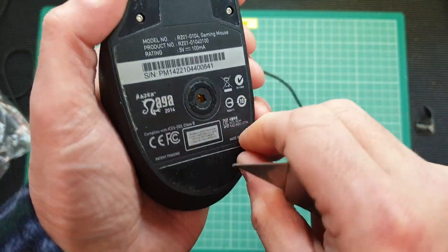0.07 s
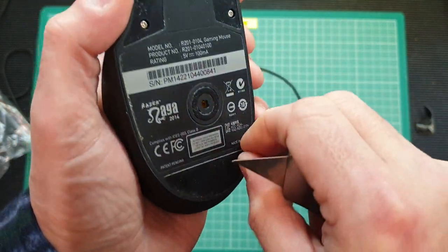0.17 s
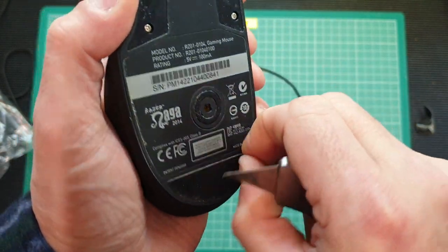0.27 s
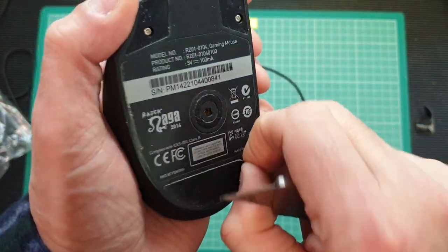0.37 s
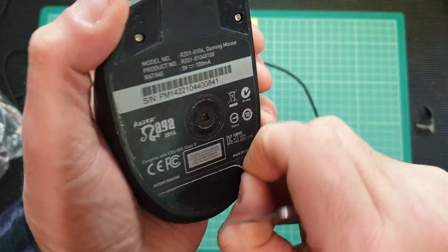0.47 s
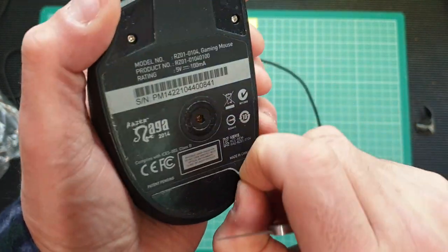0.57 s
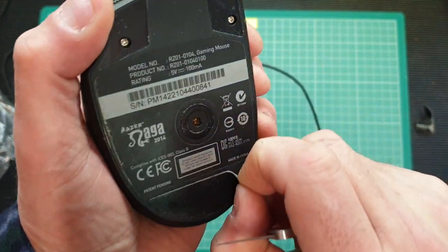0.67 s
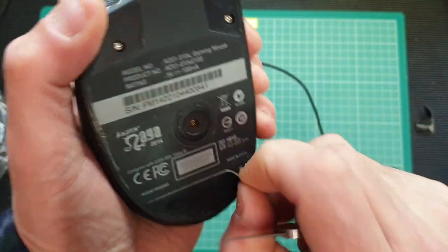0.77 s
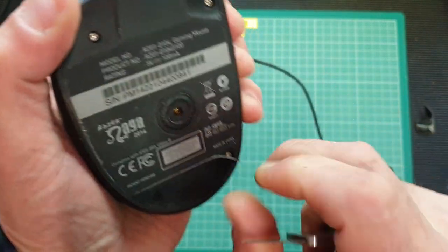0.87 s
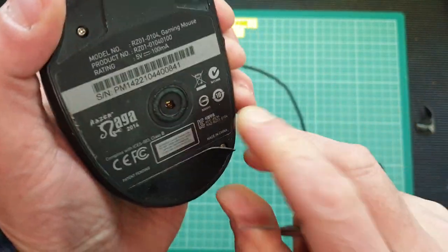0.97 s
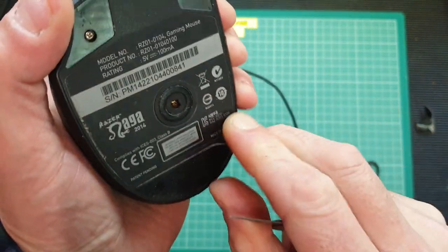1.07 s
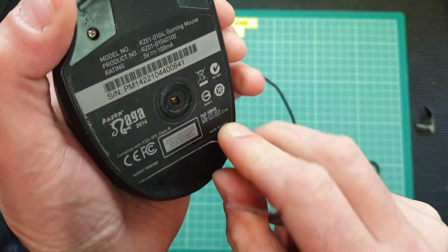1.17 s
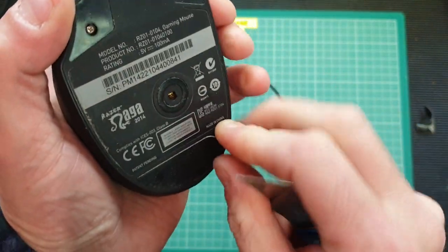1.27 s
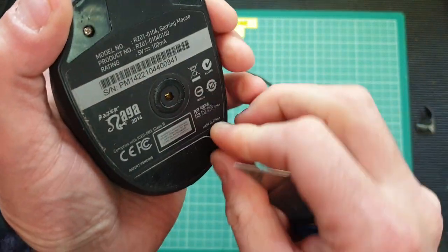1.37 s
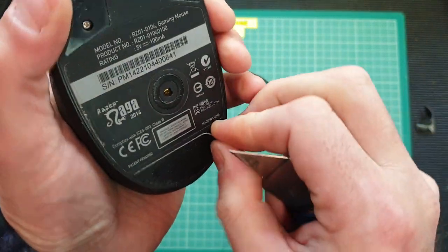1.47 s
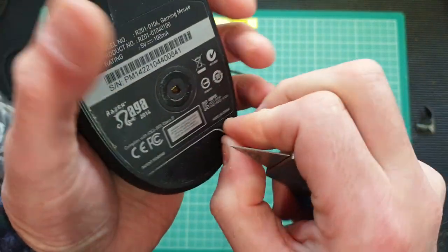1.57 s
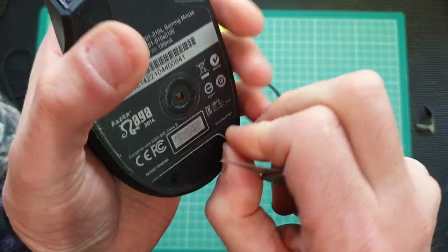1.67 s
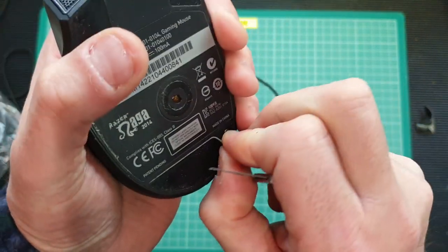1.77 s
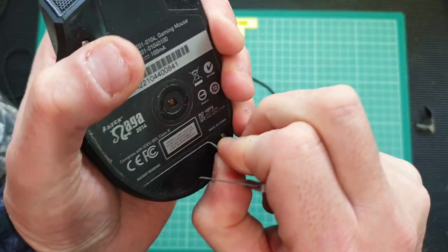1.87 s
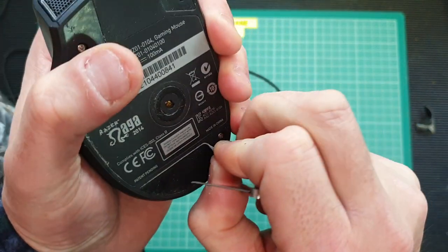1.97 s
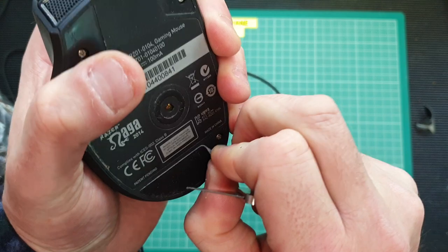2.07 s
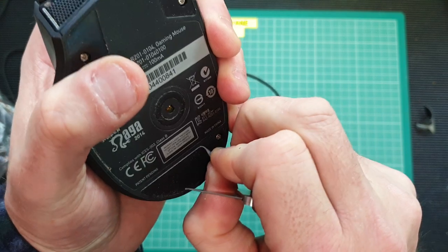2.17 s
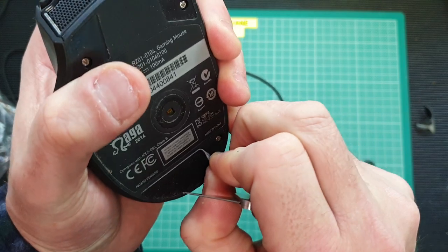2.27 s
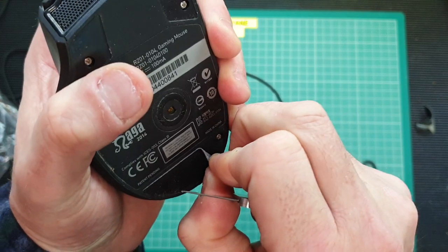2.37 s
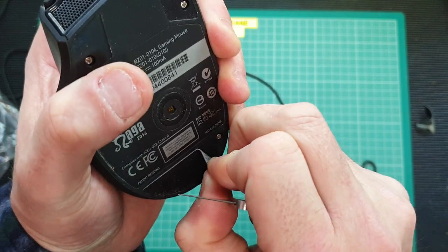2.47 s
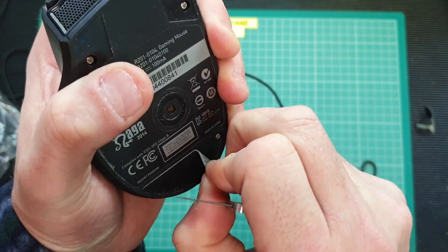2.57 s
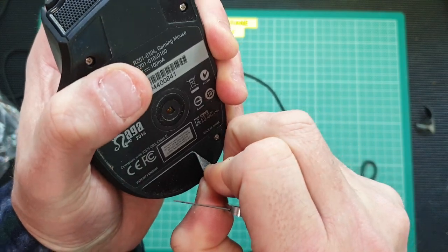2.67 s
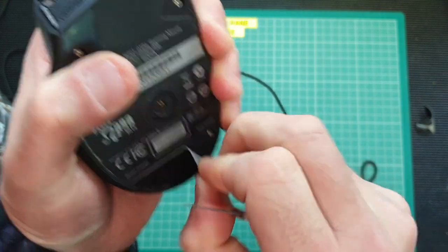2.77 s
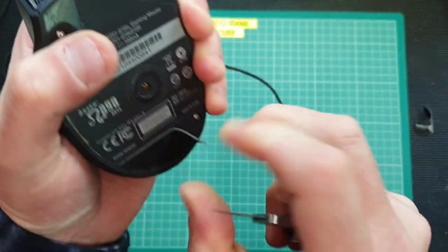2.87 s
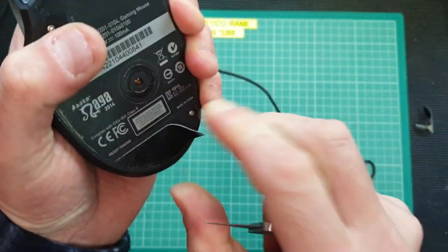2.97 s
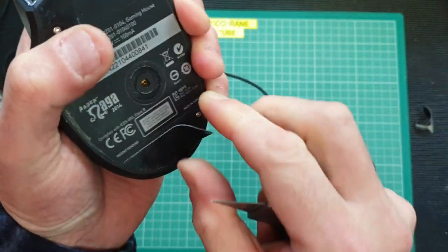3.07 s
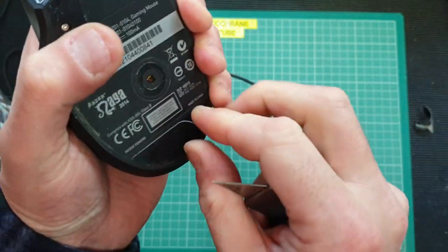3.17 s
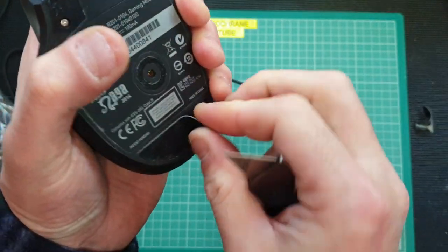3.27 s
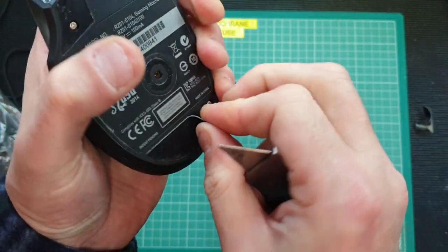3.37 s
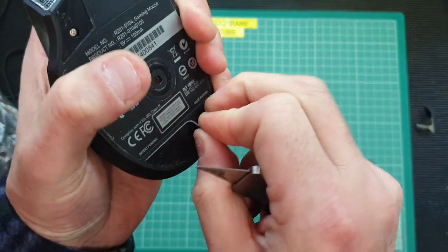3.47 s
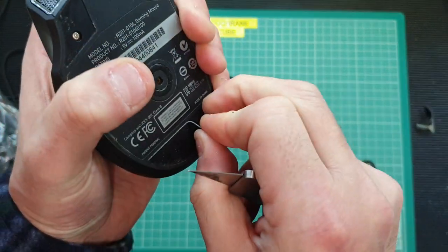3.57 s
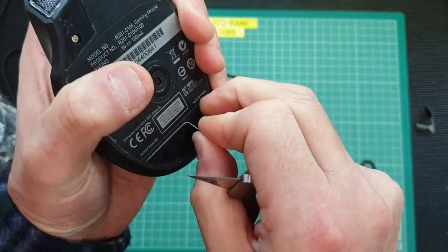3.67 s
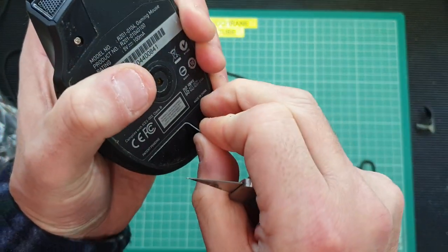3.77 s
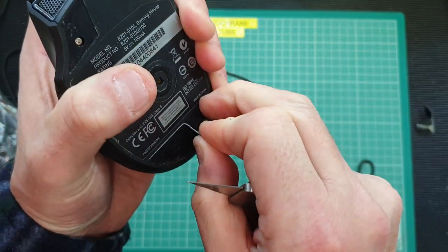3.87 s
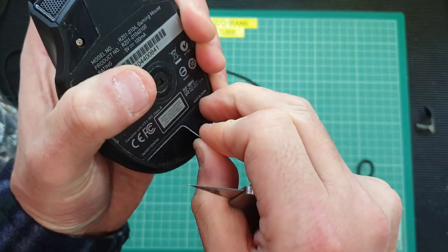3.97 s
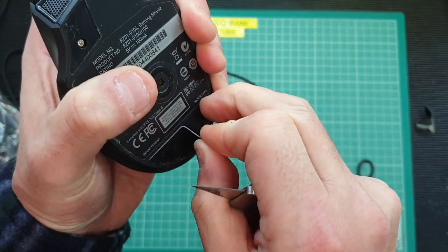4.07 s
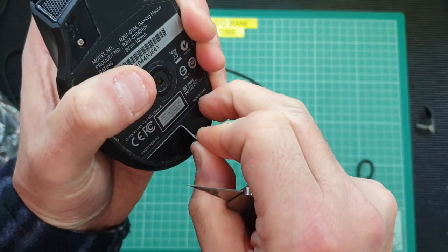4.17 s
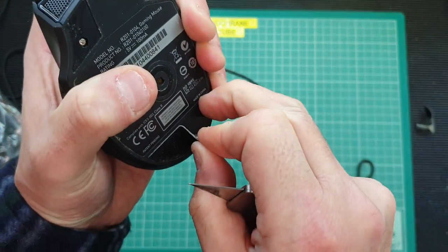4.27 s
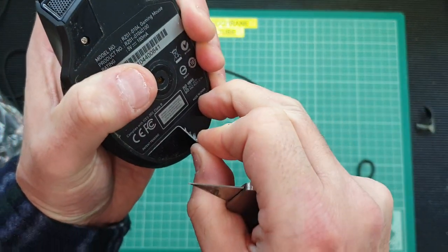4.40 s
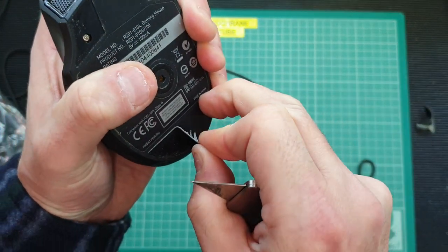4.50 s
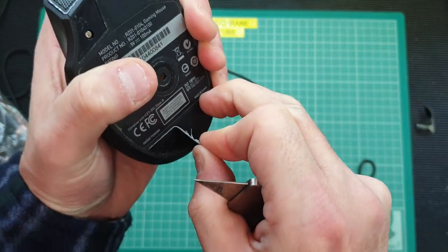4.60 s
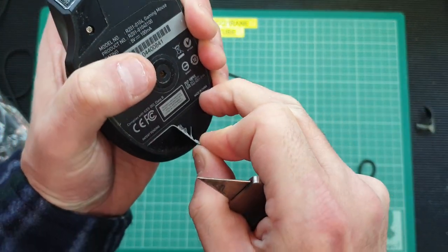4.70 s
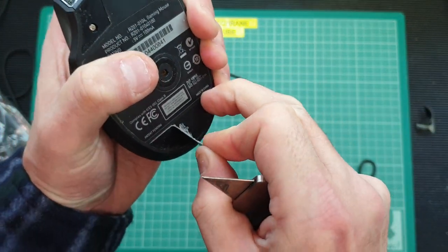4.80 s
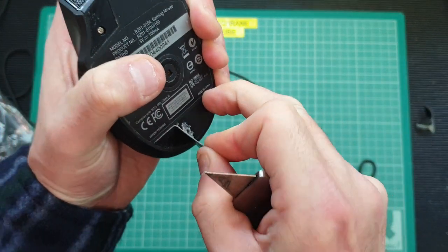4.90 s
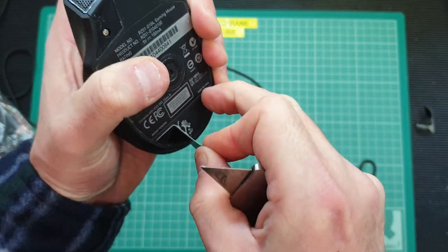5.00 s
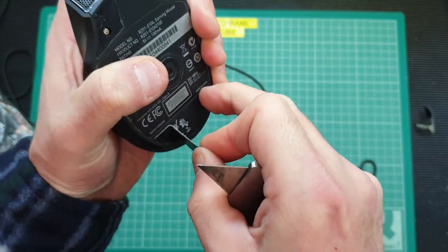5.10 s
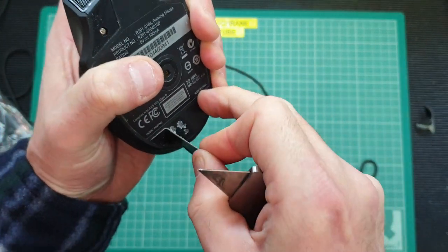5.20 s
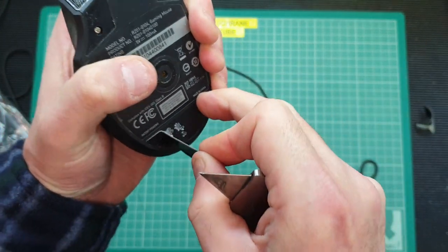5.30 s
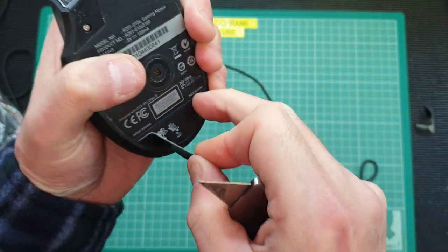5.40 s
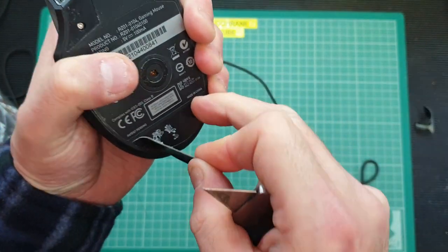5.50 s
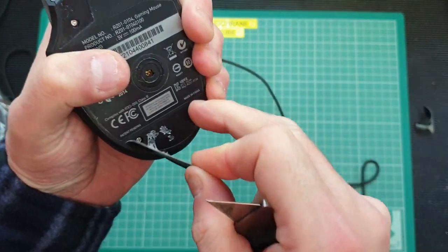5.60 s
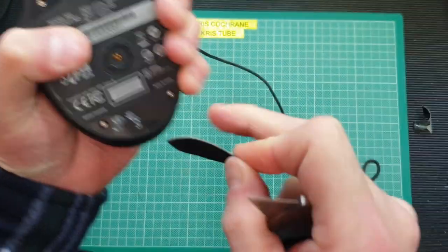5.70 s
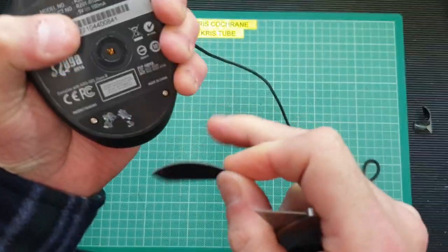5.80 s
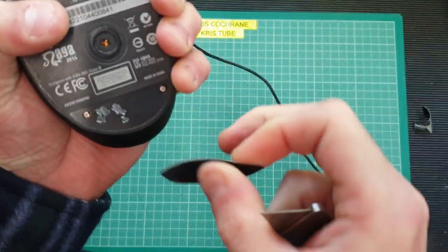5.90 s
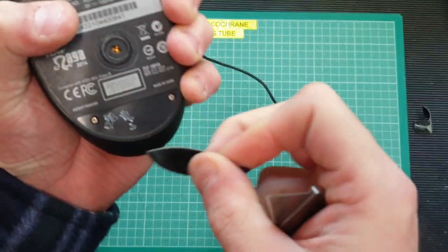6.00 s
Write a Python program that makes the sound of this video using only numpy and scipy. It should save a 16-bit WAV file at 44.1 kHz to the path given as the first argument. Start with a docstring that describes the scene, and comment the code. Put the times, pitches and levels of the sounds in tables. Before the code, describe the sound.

Close stereo microphones pick up small handwork on light plastic: a faint skin squeak, crisp nail and blade taps, sparse sticky snaps. Peeling follows in two bursts, the first thin and scratchy, the second denser and buzzier, with a hard crack as the pad comes free. Short, tight reflections, quiet room air and a slowly rising low hum lie behind it.

```python
"""Dense crackle, ticks and one sharp snap, close by: a glued plastic pad is picked loose with a blade and
peeled off the base of a hand-held computer mouse. Random thread breaks click and ring base, pad and hollow shell;
blade and nails tick as short noise bursts and damped modes; skin rubs and once squeaks in tiny slips.
The small dry room is short noise tails. Filtered noise makes its air, and sines with rumble make the low drone
of a motor that slowly gains speed, easing slightly near the end."""
import sys
import numpy as np
from scipy import signal
from scipy.fft import rfft, irfft
from scipy.io import wavfile
from scipy.ndimage import uniform_filter1d

SR = 44100
rng = np.random.default_rng(int(sys.argv[2]) if len(sys.argv) > 2 else 0)


def to_wav(s):
    """Save 16-bit WAV."""
    ch = np.atleast_2d(s).T  # columns
    pcm = np.round(np.clip(ch, -1, 1) * 32767)  # PCM
    wavfile.write(sys.argv[1], SR, pcm.astype(np.int16))


N = 266672

# air and walls of the hollow shell: [f/Hz, width/Hz, relative level/dB]
SHELL_MODES = [(629, 80, -6), (780, 120, 4), (850, 100, 2.5), (1250, 450, -13)]
# half of any left-right contrast goes to each microphone, left first
LEFT_RIGHT = np.array([[1], [-1]]) / 2


def amp(db):
    """Decibels to gain."""
    return 10 ** (np.asarray(db) / 20)


def unit(x):
    """Scale to rms 1."""
    return x / np.sqrt(np.mean(x ** 2))


def unit_energy(y):
    """Scale a response to energy 1."""
    return y / np.linalg.norm(y)


def curves(table):
    """Columns of a table, joined by straight lines in time."""
    times, *columns = np.transpose(table)
    return [np.interp(np.arange(N) / SR, times, column) for column in columns]


def walk(rate):
    """Smooth random drift with rms 1, from random steps at the given rate per second."""
    step = max(int(SR / rate), 1)
    stairs = np.repeat(rng.standard_normal(N // step + 1), step)
    return unit(uniform_filter1d(stairs, step)[:N])


def add(track, time_s, sound):
    """Mix a sound into a track at a time."""
    start = int(time_s * SR)
    track[start:start + len(sound)] += sound[:N - start]


def through(x, response):
    """Pass a sound through a response."""
    return signal.fftconvolve(x, response)[:N]


def impulse(points, peak_hz=1000, peak_db=0, size=4096):
    """Minimum-phase click of energy 1 with a drawn spectrum and one optional resonance."""
    hz, db = np.transpose(points)
    log_hz = np.log(np.fft.rfftfreq(size, 1 / SR) + 1)
    resonance = peak_db / (1 + ((log_hz - np.log(peak_hz)) / 0.28) ** 2)
    spectrum_db = np.interp(log_hz, np.log(hz), db) + resonance
    # folding the cepstrum forward puts the energy as early as it can be
    cepstrum = irfft(np.log(amp(spectrum_db)))
    cepstrum[1:size // 2] *= 2
    cepstrum[size // 2 + 1:] = 0
    return unit_energy(irfft(np.exp(rfft(cepstrum))))


def ring(modes, size=4096):
    """Coupled damped modes that swell quickly and die away; energy 1."""
    t = np.arange(size) / SR
    y = np.zeros(size)
    for hz, width, db in modes:
        envelope = width ** 2 * t * np.exp(-np.pi * width * t)
        y += amp(db) * envelope * np.sin(2 * np.pi * hz * t)
    return unit_energy(y)


def tail(start_s, t60, size=16384):
    """Dense reflections that begin after start_s and fall 60 dB in t60 seconds; energy 1."""
    t = np.arange(size) / SR - start_s
    decay = np.exp(-np.log(1000) * np.abs(t) / t60)
    return unit_energy(rng.standard_normal(size) * (t > 0) * decay)


def even(y):
    """Keep the timing of a response but level its broad colour; energy 1."""
    spectrum = rfft(y, 2 * len(y))
    power = uniform_filter1d(np.abs(spectrum) ** 2, size=len(y) // 64)
    return unit_energy(irfft(spectrum / np.sqrt(power))[:len(y)])


def space(x, pan_db, hands_db, room_db):
    """Direct sound, left first; scatter from the hands, then desk and walls."""
    right_lag_s = .00016
    out = []
    # the right microphone takes up only a little of the pan
    for side, lag_s in ((1, 0), (0.16, right_lag_s)):
        side_db = side * pan_db / 2
        near = amp(hands_db) * tail(.0002, .008)
        near[int(lag_s * SR)] += 1
        # the pan is taken back out of the room, so a nearer side sounds drier
        far = amp(room_db - side_db) * (tail(.002, 0.092) + amp(-13) * tail(0.011, 0.21))
        out.append(amp(side_db) * through(x, even(near + far)))
    return np.array(out)


def moving(x, pan_db, hands_db, room_db):
    """The hands shift, so the sound passes between two patterns of reflections."""
    angle = 1.644 * walk(3)
    first = space(x * np.cos(angle), pan_db, hands_db, room_db)
    second = space(x * np.sin(angle), pan_db, hands_db, room_db)
    return first + second


def gate_db(start, end):
    """Attack, hold and release of a stroke, in dB below its full level."""
    attack_db_per_s, release_db_per_s = 350, 300
    t = np.arange(N) / SR
    attack = attack_db_per_s * np.maximum(start - t, 0)
    release = release_db_per_s * np.maximum(t - end, 0)
    return np.maximum(-attack - release, -100)


def strokes(rows):
    """Level in dB over time of strokes given as (start, length, dB)."""
    return np.max([db + gate_db(s, s + length) for s, length, db in rows], axis=0)


def threads(rate, spread_db, bunch_db):
    """Stick-slip breaks at random, smallest sizes most common, bunched in level; rms 1."""
    breaks = rng.random(N) < rate / SR
    size_db = spread_db * np.minimum(rng.exponential(size=N), 4)
    size = amp(size_db) * rng.choice([-1, 1], N)
    return unit(breaks * size * amp(bunch_db * walk(110)))


def air(level_db):
    """Room rumble, alike at both microphones, under a thin unrelated hiss."""
    # spectrum of the room air: [f/Hz, relative level/dB]
    air_spectrum = [(20, -16.5), (40, -0.5), (75, -3), (130, -9.5), (200, -24.5), (310, -18), (420, -27.5),
                    (650, -33.5), (800, -24.5), (1050, -33), (6700, -38.5), (8400, -45), (11600, -33),
                    (16000, -30.5)]
    low_pass = signal.butter(1, 700, fs=SR, output="sos")
    high_pass = signal.butter(1, 500, "high", fs=SR, output="sos")
    shared = signal.sosfilt(low_pass, rng.standard_normal(N))
    own = signal.sosfilt(high_pass, rng.standard_normal((2, N)))
    drift = amp(level_db + 1.0 * walk(2.45))
    return drift * np.array([through(shared + hiss, impulse(air_spectrum)) for hiss in own])


def drone():
    """A motor drones and rumbles through the building, beside a hum near twice its turning rate."""
    # overtones of the motor: [multiple of turning rate, relative level/dB, share of swell followed/0-1]
    motor_orders = [(1, -42, 1), (2, -62.5, .8), (3, -78, 0.07)]
    # swell of the motor, taken against its usual level: [t/s, level/dB]
    motor_swell = [(0.0, -77), (0.3, -55), (0.6, -58), (1.03, -52), (1.09, -68), (1.33, -53), (1.63, -60),
                   (1.7, -72), (2.1, -56), (2.14, -63), (2.47, -49), (3.2, -47), (3.65, -39), (4.13, -45),
                   (4.28, -40), (5.44, -39), (5.49, -42), (6.05, -44)]
    # spectrum of the rumble: [f/Hz, relative level/dB]
    rumble_spectrum = [(20, -24), (55, -3.5), (80, 5), (125, -3.5), (180, -10), (250, -14), (320, -13),
                       (420, -24), (1000, -41), (4000, -61)]
    # the turning rate climbs along an arch
    top_hz, top_s, bend_hz_per_s2 = 51.3, 4.6, 0.41
    lead = 0.61 * LEFT_RIGHT  # radians by which the left leads
    hz = top_hz - bend_hz_per_s2 * (np.arange(N) / SR - top_s) ** 2
    phase = 2 * np.pi * np.cumsum(hz) / SR
    swell_db = curves(motor_swell)[0] + 42.7

    motor = np.zeros((2, N))
    for multiple, order_db, share in motor_orders:
        level = amp(order_db + share * swell_db + 0.78 * walk(10))
        motor += level * np.sin(multiple * phase + lead)

    hum_hz = 96.5 * (1 + 0.0063 * walk(6.95))
    hum_phase = 2 * np.pi * np.cumsum(hum_hz) / SR
    hum = amp(-57.5 + 0.78 * walk(4) + 0.3 * swell_db) * np.sin(hum_phase + lead)

    noise = through(rng.standard_normal(N), impulse(rumble_spectrum))
    rumble = amp(-67 + 0.84 * swell_db) * noise
    return (np.sqrt(2) * (motor + hum) + rumble) * amp(-1.9 * LEFT_RIGHT)


def fingertip():
    """A fingertip slides over the plastic near the end, in tiny slips with a soft hiss."""
    # level of the slide: [t/s, level/dB]
    slide_levels = [(5.9, -88), (5.97, -81), (5.985, -57), (6.02, -63), (6.05, -77)]
    skin_modes = [(5200, 800, -4), (6120, 900, -6), (6900, 400, -12)]  # f/Hz, width/Hz, level/dB
    rub = threads(rate=3900, spread_db=0, bunch_db=0.5) * amp(curves(slide_levels)[0])
    return space(through(rub, ring(skin_modes)), pan_db=6.0, hands_db=-3.5, room_db=-6.5)


def grip():
    """Fingers shift on the shell: skin drags in small slips, and once squeaks softly."""
    # drags of the skin: [start t/s, length/s, level/dB]
    grip_shifts = [(0.74, 0.04, -78), (1.1, 0.08, -79), (1.53, 0.02, -70), (1.8, 0.14, -73),
                   (3.19, 0.07, -73), (3.33, 0.08, -69), (3.46, 0.16, -73)]
    # what the grip rings with: [f/Hz, width/Hz, relative level/dB]
    grip_modes = [(335, 90, 1), (815, 130, -2), (2000, 600, -7)]
    squeak_stroke = (0.0, 0.08, -71)  # start/s, length/s, level/dB
    squeak_mode = (1820, 200, 0)  # f/Hz, width/Hz, level/dB
    slips = threads(rate=900, spread_db=2.0, bunch_db=2.5)
    drag = through(slips * amp(strokes(grip_shifts)), ring(grip_modes))
    squeak = through(slips * amp(strokes([squeak_stroke])), ring([squeak_mode]))
    return space(drag + squeak, pan_db=3.0, hands_db=-3.0, room_db=-3.0)


def fracture(level_db):
    """A catch crumbles in a short flurry of slips; the harder the break, the shorter it is."""
    t60 = 0.0097 * amp(-.2 * (level_db + 53))
    return even(tail(0, t60, size=1024))


def ticks(rows, echo_db=0):
    """A catch lets go: the edge cracks, the plastic flexes at its own pitch, the shell knocks."""
    # spectrum of the cracking edge: [f/Hz, relative level/dB]
    edge_spectrum = [(200, -23.5), (1000, -41.5), (3500, -19), (5500, -9.5), (7000, -9), (9000, -10.5),
                     (11000, -4), (12300, -2), (14000, -2), (16500, -5)]
    # spectrum of the flexing plastic: [f/Hz, relative level/dB]
    flex_spectrum = [(150, -9), (310, -8), (450, -17), (1050, -14), (1500, -6.5), (2100, -2), (2900, -2.5),
                     (3600, -8), (4300, -8), (7000, -11), (12000, -19)]
    edge, flex, knock = np.zeros((3, N))
    crack = impulse(edge_spectrum)
    for s, edge_db, flex_db, knock_db, hz in rows:
        add(edge, s, amp(edge_db + 27.5) * signal.fftconvolve(fracture(edge_db), crack))
        add(flex, s, amp(flex_db + 26.5) * impulse(flex_spectrum, peak_hz=hz, peak_db=8))
        # each place of contact and each grip favours other modes of the shell
        shell = [(f * (1 + 0.024 * rng.normal()), width, db + 2 * rng.normal())
                 for f, width, db in SHELL_MODES]
        add(knock, s, amp(knock_db + 25.5) * ring(shell))
    return (space(edge, pan_db=4.5, hands_db=-4, room_db=echo_db - 4)
            + space(flex, pan_db=0.5, hands_db=3, room_db=echo_db + 2.5)
            + space(knock, pan_db=6.0, hands_db=-4.5, room_db=echo_db - 1.5))


def taps():
    """Blade and nail tap the plastic, each with its own mix of edge, flex and knock."""
    # levels ahead of each layer's make-up gain:
    # [t/s, crisp edge level/dB, flexing plastic level/dB, hollow knock level/dB, flexing spot f/Hz]
    tap_rows = [(0.0988, -87, -61, -57.5, 1200), (0.121, -54, -55, -61, 1700),
                (0.5798, -48, -61, -61.5, 1400), (0.8968, -63, -56.5, -65, 2100),
                (0.9933, -46.5, -54, -60.5, 4040), (1.6041, -54.5, -57, -53.5, 1300),
                (1.678, -47.5, -61, -57, 2680), (1.7685, -46, -60, -80, 1780),
                (1.8008, -63, -56, -61, 1900), (2.1518, -43, -52, -73, 1500),
                (2.904, -47.5, -37, -51, 2450), (2.9147, -46, -55, -61, 2534),
                (3.5946, -40, -49.5, -49.5, 1990), (5.2514, -56.5, -53, -67.5, 2240)]
    return ticks(tap_rows)


def strands():
    """Thick strands snap singly: thin ticks at first, fuller as the pad comes free to flex."""
    # snaps, ahead of the make-up gain: [t/s, level/dB]
    snap_rows = [(0.387, -50), (0.4308, -54), (0.456, -53), (0.516, -54.5), (0.6038, -54.5), (0.6438, -57),
                 (1.8971, -52), (2.088, -53.5), (2.3917, -50.5), (2.4306, -53.5), (2.4791, -50),
                 (3.7633, -49), (4.2349, -51.5), (4.5729, -54), (4.7701, -49.5), (4.938, -49),
                 (4.9814, -52), (5.2829, -55), (5.5801, -53), (5.6057, -50), (5.685, -51), (5.815, -60)]
    # flex and shell knock against the snap; the flex grows with time
    flex_db, flex_db_per_s, knock_db, flex_hz = -23, 3.0, -27, 4400
    return ticks([(s, db, db + flex_db + flex_db_per_s * s, db + knock_db, flex_hz)
                  for s, db in snap_rows])


def let_go():
    """The pad lets go in one loud, sharp snap; a little light snapping from other layers follows."""
    # t/s, then edge, flex and knock level/dB ahead of make-up gain, flexing spot f/Hz
    snap = (5.7111, -20.5, -31.5, -38.5, 3000)
    pan_db = 1.5
    return ticks([snap], echo_db=-1) * amp(pan_db * LEFT_RIGHT)


def effort():
    """Levels of glue, base and pad in dB, set by the loudest pick or pull at each moment."""
    # levels in these tables stand ahead of each layer's trim
    # short picks at the edge of the pad: [start t/s, length/s, snapping glue level/dB, base rasp level/dB]
    pick_rows = [(0.36, 0.29, -63.5, -76), (0.895, 0.055, -67, -66), (1.14, 0.08, -75, -79),
                 (1.33, 0.06, -73, -80), (5.93, 0.12, -63, -73)]
    # the first pull lifts a corner: [t/s, snapping glue level/dB, base rasp level/dB, pad buzz level/dB]
    first_pull = [(1.48, -79, -78, -89), (1.64, -58, -67, -73), (1.74, -58, -72, -77), (1.8, -57, -65, -69),
                  (2.0, -69, -73, -86), (2.11, -60, -64, -76), (2.22, -65, -67, -76), (2.39, -58, -63, -72),
                  (2.56, -63, -67, -67), (2.76, -64, -71, -76)]
    # the second strips the pad: [t/s, snapping glue level/dB, base rasp level/dB, pad buzz level/dB]
    second_pull = [(3.52, -74, -79, -80), (3.58, -56, -59, -65), (3.82, -59, -61, -66),
                   (3.89, -54, -56, -60), (3.97, -66, -68, -72), (4.19, -64, -68, -72),
                   (4.42, -58, -62, -67), (4.6, -57, -60, -62), (4.7, -58, -62, -66), (5.0, -52, -60, -62),
                   (5.17, -57, -61, -61), (5.24, -64, -69, -70), (5.38, -57, -66, -66),
                   (5.45, -61, -73, -73), (5.51, -48, -62, -63), (5.67, -52, -64, -67),
                   (5.705, -38, -52, -58)]
    pick_pad_db = -10  # a pick hardly moves the pad: its buzz against the rasp
    levels = []
    for s, length, glue, base in pick_rows:
        full = np.array([[glue], [base], [base + pick_pad_db]])
        levels.append(full + gate_db(s, s + length))
    for pull in (first_pull, second_pull):
        # a pull swells and fades twice as fast in dB as a pick
        levels.append(np.array(curves(pull)) + 2 * gate_db(pull[0][0], pull[-1][0]))
    return np.max(levels, axis=0)


def peeling():
    """Each breaking thread clicks, rasps the base and plucks the pad, which passes a little to the shell."""
    # spectrum of snapping glue: [f/Hz, relative level/dB]
    glue_spectrum = [(300, -38), (1200, -30), (2400, -17.5), (3600, -18), (5600, -14), (8300, -12.5),
                     (10500, -5.5), (12500, -2), (15000, 0), (16500, -7)]
    # bending of the stiff base: [f/Hz, width/Hz, relative level/dB]
    base_modes = [(4600, 1200, -1.5), (5500, 1400, -4), (6500, 1700, -1)]
    # bending of the taut pad: [f/Hz, width/Hz, relative level/dB]
    pad_modes = [(2000, 280, -9.5), (2190, 310, 12.5), (2750, 750, 1)]
    # the shell creaks under the pull of the pad
    creaks_per_s, creak_db = 14, -22  # level against the pad
    creak_mode = (430, 300, 0)  # f/Hz, width/Hz, level/dB

    glue_db, base_db, pad_db = effort() + 1.3 * walk(22)  # the peel line advances in uneven surges
    # picking at the edge gives lone snaps; pulling the freed pad makes them crowd together
    crowd = amp(.3 * (np.maximum(pad_db, -85) + 64))
    coarse = threads(rate=330 * crowd, spread_db=3.2, bunch_db=1.5)
    fine = threads(rate=3000, spread_db=2.6, bunch_db=3.5) * np.sqrt(crowd)

    clicks = (coarse + amp(-2.5) * fine) * amp(glue_db + 0.2)
    crackle = through(clicks, impulse(glue_spectrum))
    scrape = (amp(-1) * coarse + fine) * amp(base_db - 4.7)
    rasp = through(scrape, ring(base_modes))

    pluck = (amp(-4) * coarse + fine) * amp(pad_db - 3)
    creaks = threads(rate=creaks_per_s, spread_db=2.5, bunch_db=1.0) * amp(pad_db + creak_db)
    buzz = through(pluck, ring(pad_modes))
    buzz += amp(-17.5) * through(pluck, ring(SHELL_MODES))
    buzz += through(creaks, ring([creak_mode]))
    return (moving(crackle, pan_db=0.5, hands_db=3.5, room_db=-4.5)
            + moving(rasp, pan_db=6.5, hands_db=-0.5, room_db=-4.0)
            + moving(buzz, pan_db=10.0, hands_db=-0.5, room_db=-4.0))


def scene():
    """The work of the hands over the quiet room."""
    room = air(level_db=-65) + drone()
    skin = fingertip() + grip()
    return room + skin + taps() + strands() + let_go() + peeling()


def record(dry):
    """The left microphone hears the upper midrange more strongly than the right; the top is cut steeply."""
    centre_hz, width_hz, share = 5300, 3200, 0.3  # share added on the left and lost on the right
    top_hz = 16000
    midrange = signal.lfilter(*signal.iirpeak(centre_hz, centre_hz / width_hz, fs=SR), dry)
    heard = dry + 2 * share * LEFT_RIGHT * midrange
    return signal.sosfilt(signal.ellip(10, .2, 80, top_hz, fs=SR, output="sos"), heard)


dry = scene()
out = record(dry)
to_wav(out)
```